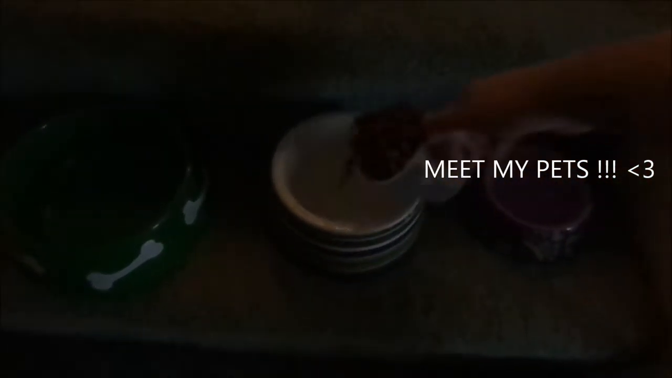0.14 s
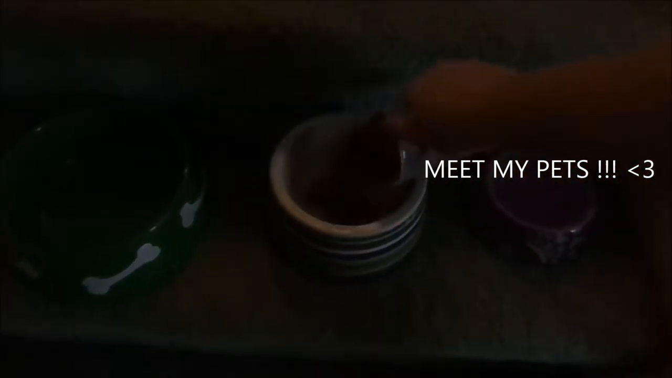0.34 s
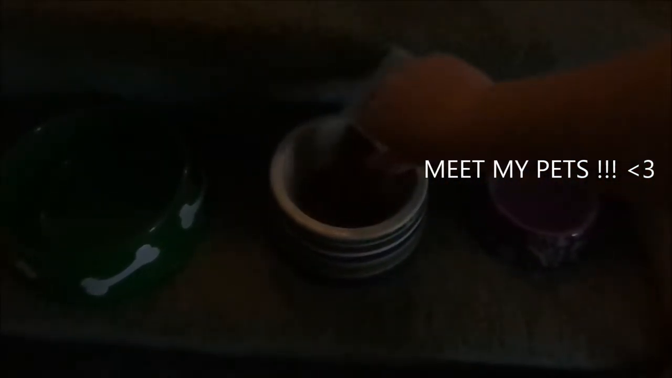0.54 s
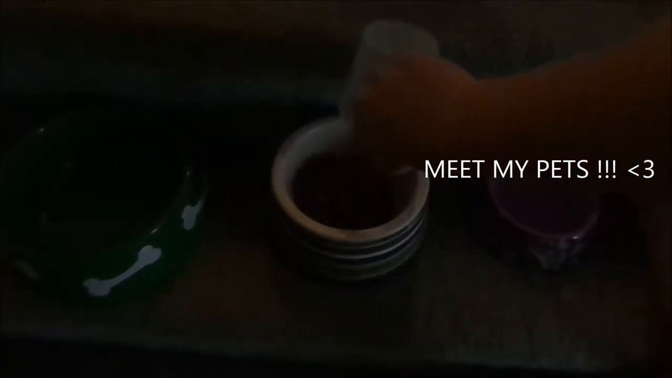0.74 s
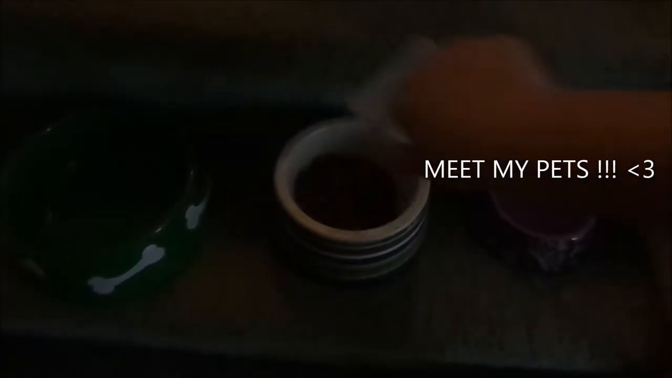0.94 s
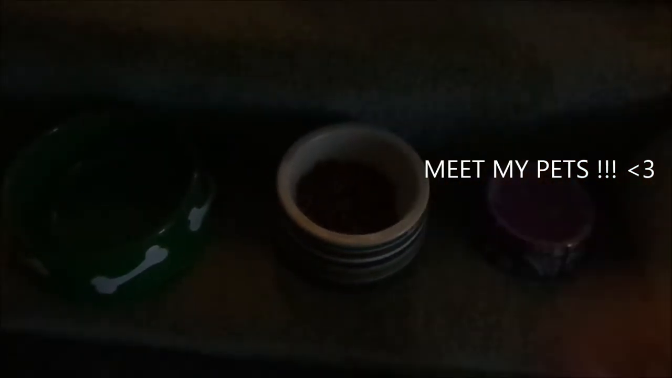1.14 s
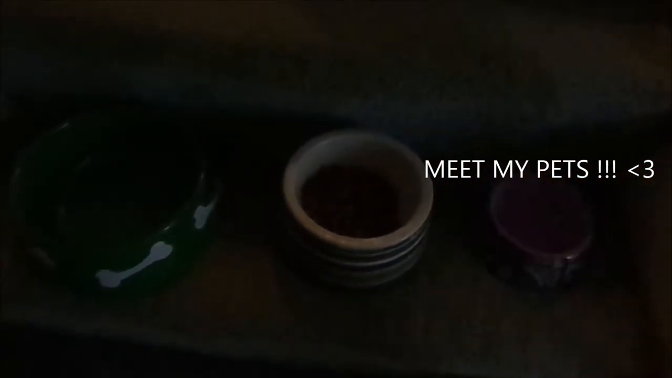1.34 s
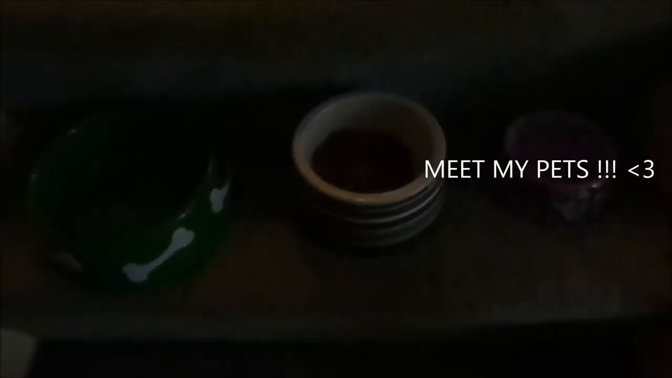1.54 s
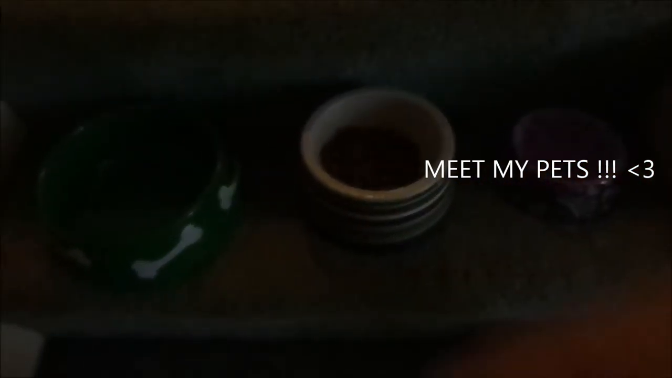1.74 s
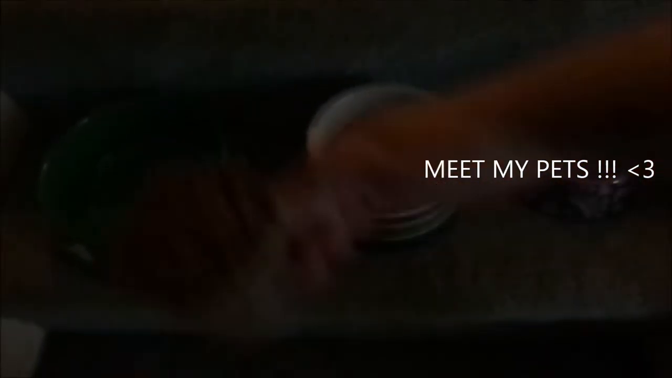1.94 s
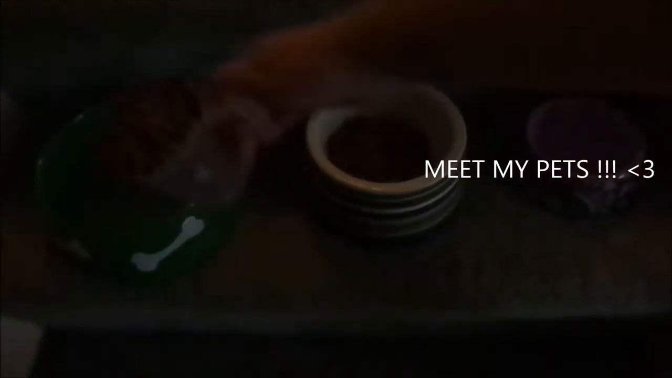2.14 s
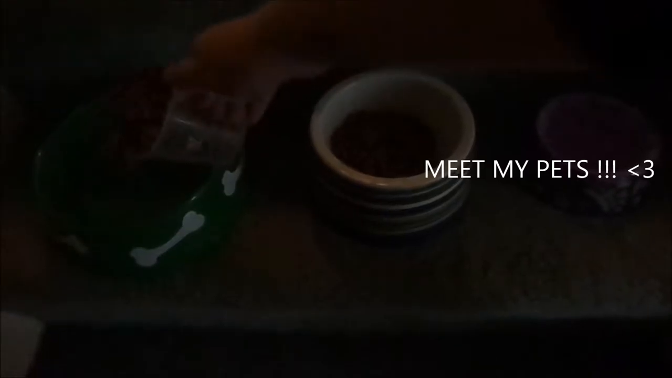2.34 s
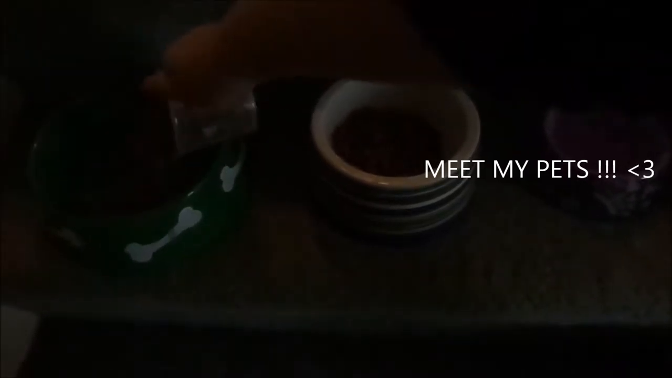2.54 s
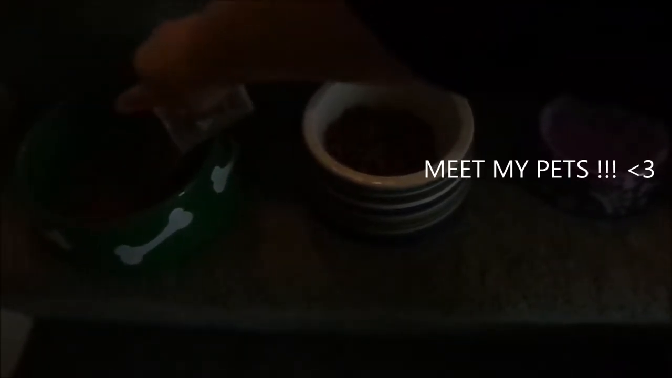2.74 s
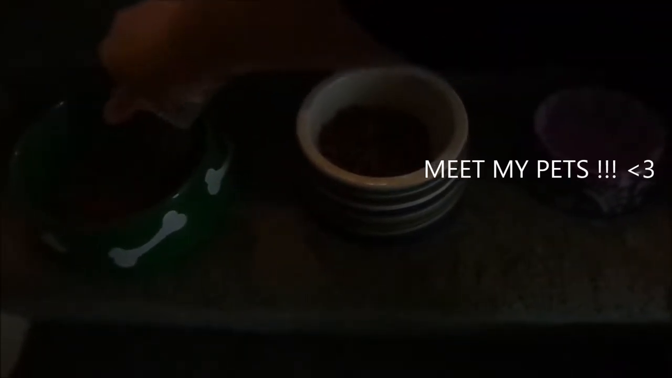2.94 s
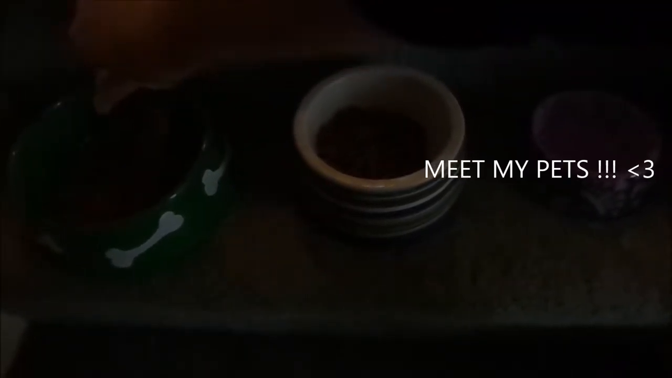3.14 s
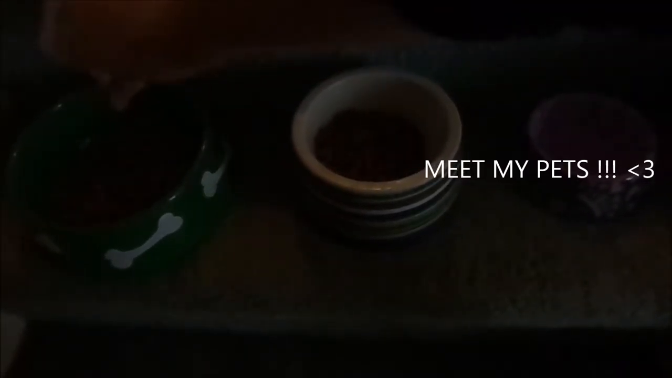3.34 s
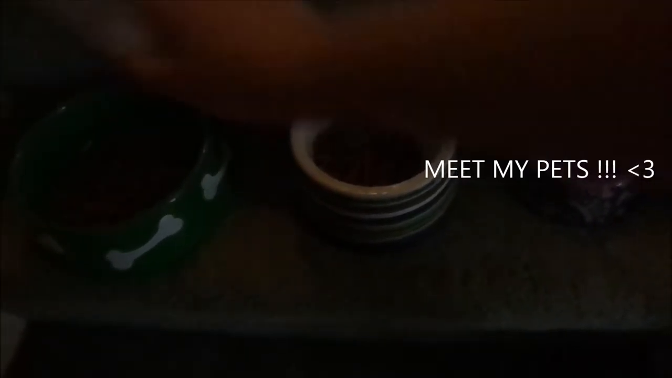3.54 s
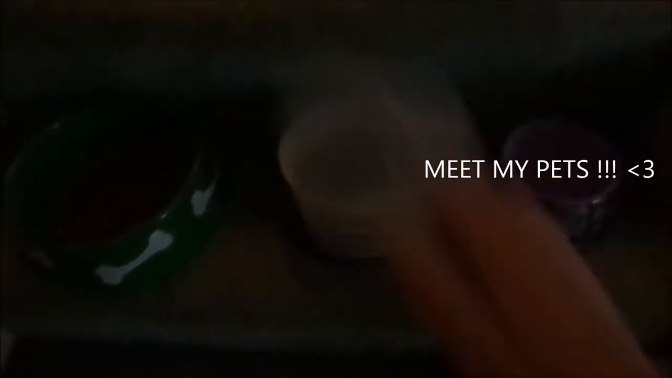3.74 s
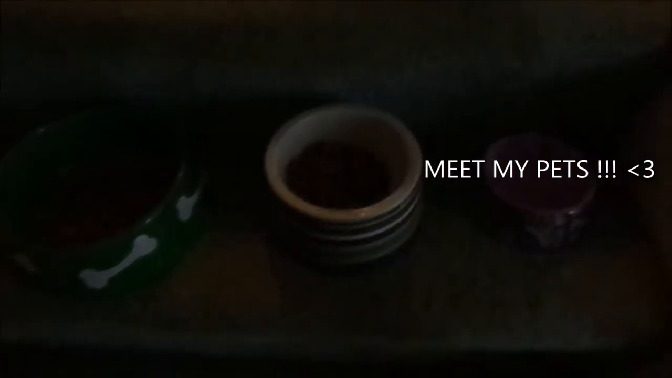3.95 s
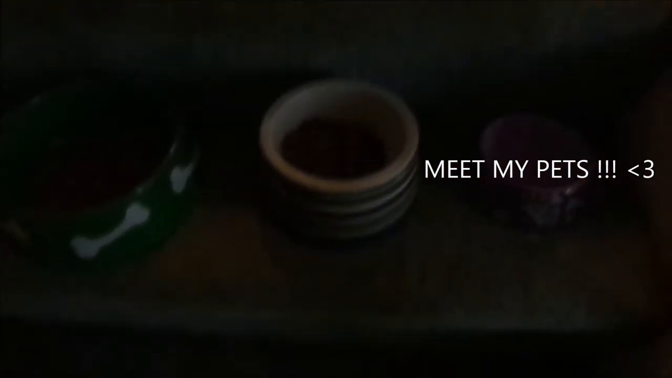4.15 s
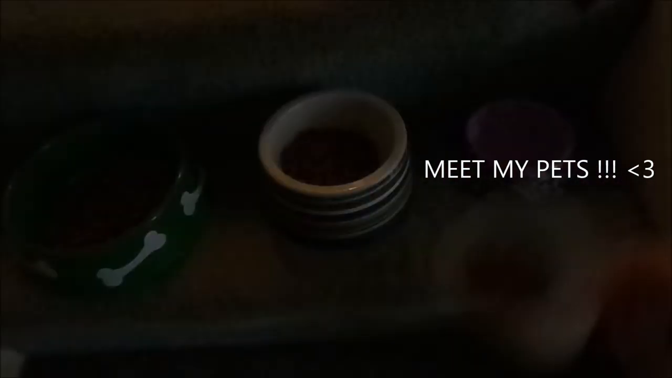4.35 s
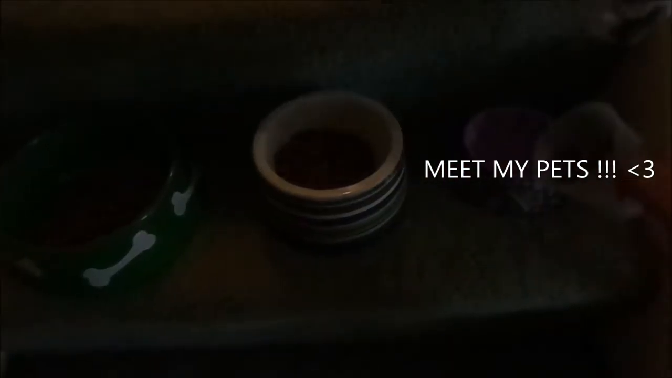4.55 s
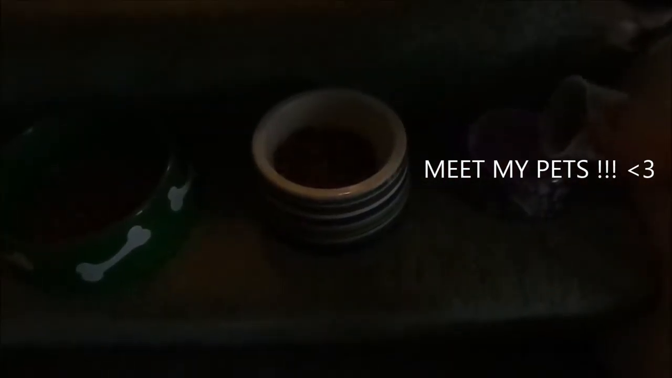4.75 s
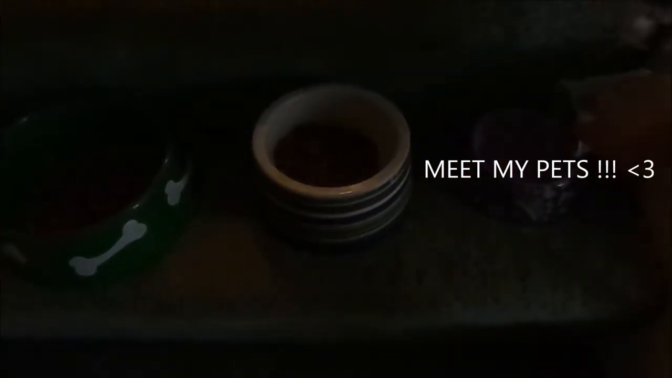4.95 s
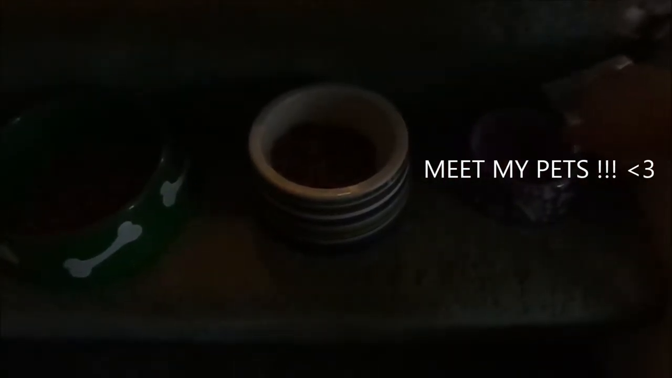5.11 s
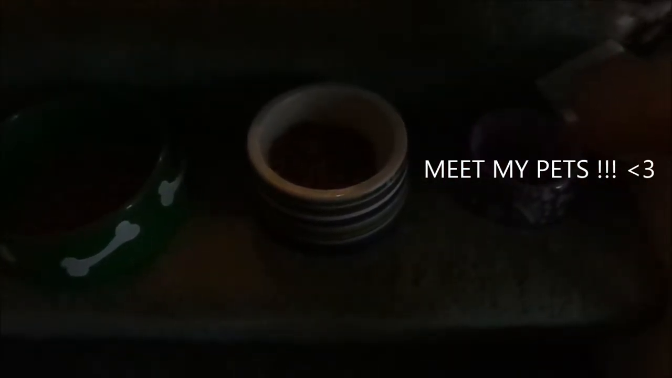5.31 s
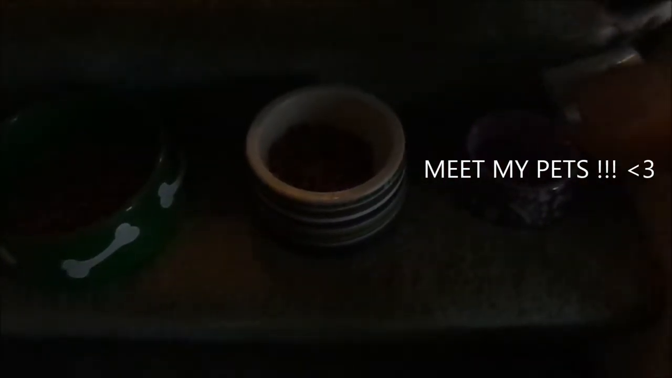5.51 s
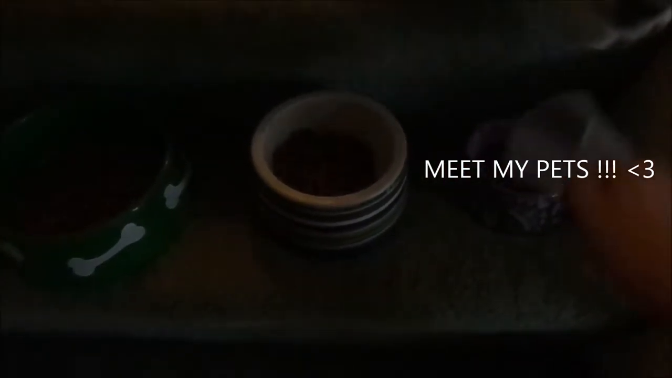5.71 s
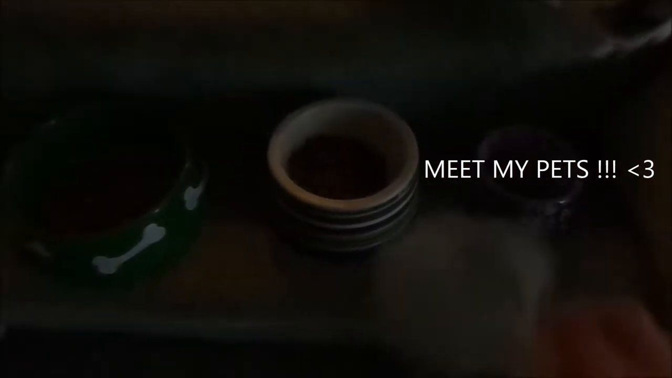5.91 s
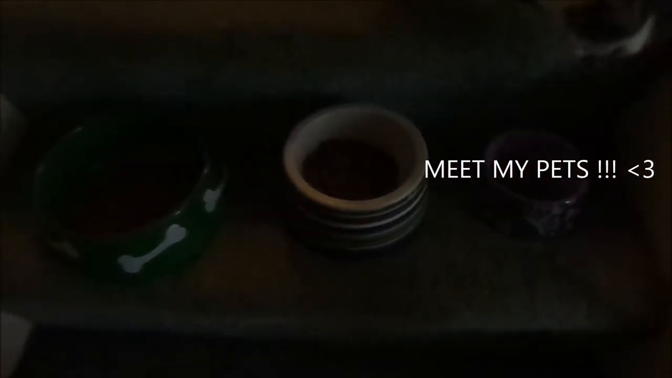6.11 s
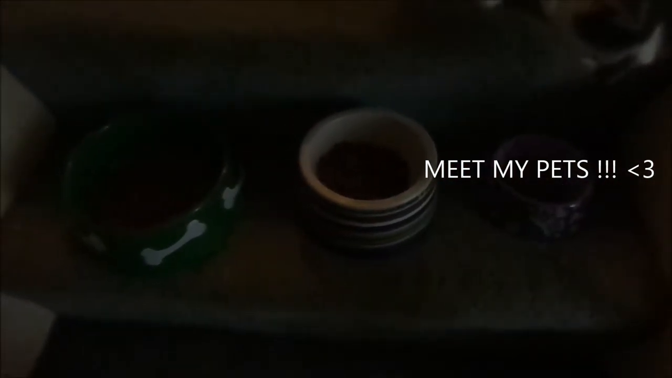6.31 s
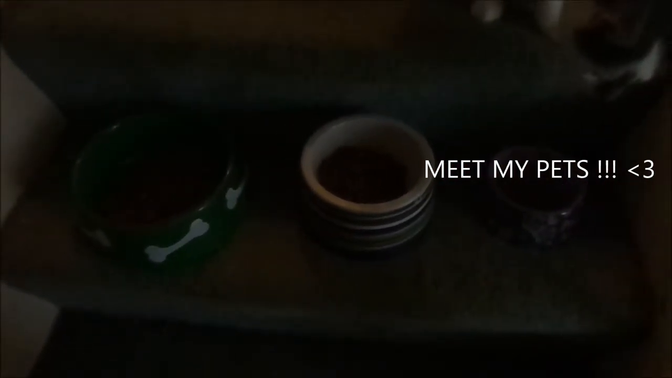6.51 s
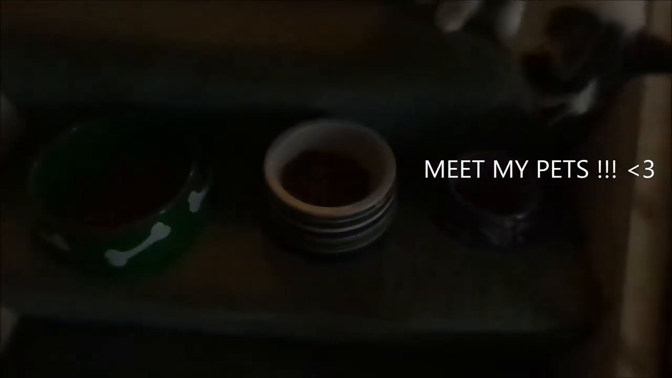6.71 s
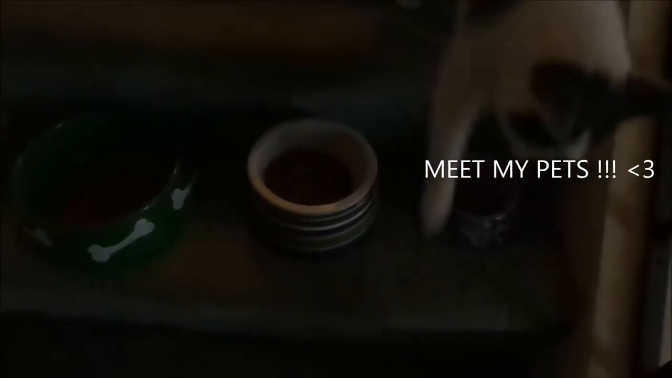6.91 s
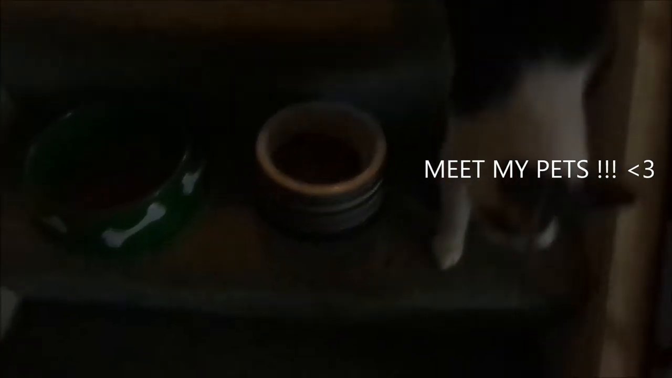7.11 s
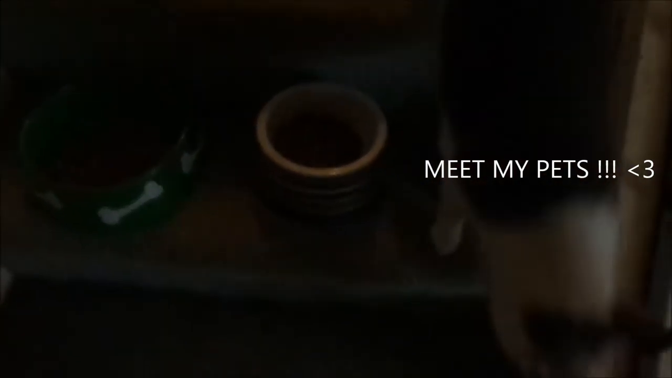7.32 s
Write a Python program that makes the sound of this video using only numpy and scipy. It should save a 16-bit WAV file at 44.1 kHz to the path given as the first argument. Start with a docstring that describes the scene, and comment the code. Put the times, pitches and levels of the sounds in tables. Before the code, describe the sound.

A soft scuff and a tiny tinkle open the scene in a small, quietly humming room. At 0.3 seconds dry pet food rattles from a plastic cup into a ringing bowl close by, the clicks dulling as it fills and ending around 1 second. A tiny collar bell tinkles, feet scuff, and a distant cat mews faintly at 1.6 seconds. From 2.4 seconds pellets clatter into a wide, duller bowl, trailing off in stray clicks by 3.5. A second faint, thin mew follows at 3.7. At 5 seconds a short, bright pour fills a little bowl, and at 5.5 a dog gives one muffled woof. At 6.4 something is put down with a sharp knock and a few light wooden taps. Feet and paws keep scuffing softly, and the collar bell tinkles again at about 7.3 seconds.

```python
"""A soft scuff and a tiny tinkle, then dry pet food rattles from a plastic cup into three bowls in a
small room: a ringing one, a wide dull one, a little one. Every pellet clicks and rings its bowl.
Something is put down with a knock and light wooden taps. Further off, a cat mews faintly twice in thin
harmonics and a dog gives one muffled woof of throaty pulses. Feet and paws scuff about, a ball rattles
in a tiny collar bell, and the house hums underneath."""
import sys
import numpy as np
from scipy import signal
from scipy.fft import rfft, irfft
from scipy.io import wavfile
from scipy.ndimage import uniform_filter1d

SR = 44100
rng = np.random.default_rng(int(sys.argv[2]) if len(sys.argv) > 2 else 0)


def store_pcm(level_fs):
    """Save levels as 16-bit WAV."""
    pcm = np.round(np.clip(level_fs, -1, 1) * 32767).astype(np.int16)
    wavfile.write(sys.argv[1], SR, np.atleast_2d(pcm).T)


N = 325017
T = np.arange(N) / SR

# the ring of each bowl: pitch_hz, t60_s, energy_db
RINGING_BOWL_MODES = [(1268, .14, -5.5), (1402, 0.11, -16.5), (2455, .075, 1), (2500, 0.048, 2),
                      (3717, 0.028, 3), (3920, 0.016, 4.5), (4190, 0.027, -2.5), (4410, 0.038, -11),
                      (6040, 0.0096, -4), (6340, 0.022, -7), (6900, 0.0091, -6.5), (8070, .02, -12.5),
                      (8840, 0.017, -3), (8830, .02, -8.5)]
WIDE_BOWL_MODES = [(490.6, 0.18, -6.5), (734, 0.063, -6.5), (765, 0.073, -9.5), (1230, 0.06, -19),
                   (1531, 0.022, 2), (1744, 0.019, -2.5), (2200, 0.022, -2.5), (2430, 0.042, -13.5),
                   (3270, 0.017, -7), (4240, 0.026, -9.5)]
SMALL_BOWL_MODES = [(991, 0.068, -8), (1287, 0.033, -8.5), (2164, 0.05, -1.5), (2330, 0.013, -1.5),
                    (3410, 0.034, 0), (3670, 0.05, -9), (4140, 0.06, -8.5), (4600, 0.028, -16),
                    (5260, 0.0233, -12), (6200, 0.032, -24), (6600, 0.034, -15), (7520, 0.027, -14),
                    (8970, 0.011, -13.5), (11800, 0.018, -22)]
# EQ of a pellet's click in each bowl: freq_hz, gain_db
RINGING_BOWL_CLICK = [(100, -31), (350, -14), (700, -13.5), (1000, -7), (1300, -1), (1700, -9.5),
                      (2600, -4), (3600, -0.5), (5000, 0.5), (7500, 3.5), (10000, -3), (14000, -5),
                      (16000, -17)]
WIDE_BOWL_CLICK = [(47, -55), (120, -37), (250, -21), (400, -12), (490, -11), (580, -8), (757, -1),
                   (1000, -8), (1570, -4.5), (1910, -9.5), (2200, -5), (4200, -14.5), (13000, -23.5),
                   (15500, -36)]
SMALL_BOWL_CLICK = [(100, -24), (500, -3), (900, -3), (1700, -9), (2600, 1.5), (5200, 13), (8000, 6),
                    (13500, 4), (16000, -37)]
# surges of pellets sliding out of the cup: start_s, level_db, rise_s, hold_s, t60_s
SURGES = [(.305, -26, 0.022, 0.19, 0.64), (.425, -14.5, 0.028, .01, 0.06), (.58, -31, 0.12, .17, 0.14),
          (2.465, -20.5, 0.012, 0.063, .3), (2.54, -16.5, 0.019, 0.049, 0.14),
          (2.62, -20.5, 0.052, 0.18, 1.4), (2.68, -16, 0.024, .015, .22), (3.1, -33.5, 0.09, 0.071, 0.39),
          (4.955, -43.5, .005, 0.14, .1), (5.08, -19, 0.062, 0.098, 0.29)]
# single hard pellets that stand out of the stream: start_s, strength_db
HARD_PELLETS = [(.3044, 13.5), (.329, 0), (.3397, 10.5), (.343, 11.5), (.355, 5), (.3728, 12.5), (.404, 3),
                (.42, 4), (.4347, 7.5), (.49, 1.5), (.521, 2), (.638, -4), (.7124, -3.5), (.7395, 0.5),
                (.7603, 4), (.8161, 0.5), (.8473, 0), (2.311, -19), (2.412, 9), (2.443, 5.5), (2.463, 11.5),
                (2.472, 9), (2.51, 9.5), (2.54, 7), (2.556, 14), (2.564, 10.5), (2.591, 1), (2.608, 9.5),
                (3.336, -9.5), (3.393, -11), (3.434, -24), (3.489, -19.5), (5.0132, 9), (5.046, 2.5),
                (5.0555, 5), (5.086, 8), (5.095, 9), (5.109, 7), (5.1184, 5), (5.138, 8.5), (5.1593, 8.5),
                (5.237, 5.5), (5.266, -6), (5.2905, 1.5), (5.313, -4), (5.3375, -3.5)]


def pour(span_s, modes, click_eq, pellets_per_s, click_t60, ring_db, shift_s, empty_db=-42.5, spots=12):
    """Pellets land on random spots; each cracks and rings the bowl, whose share shifts as it fills."""
    flow = np.sqrt(sum((undb(db) * envelope(s, rise, hold, t60)) ** 2
                       for s, db, rise, hold, t60 in during(SURGES, span_s)))
    landings = (rng.random(N) < pellets_per_s / SR) & (flow > undb(empty_db))
    size_db = 3.5 * np.minimum(rng.exponential(size=N), 3)
    sizes = landings * undb(size_db) * rng.choice([-1, 1], N)
    # the flow sets how much energy lands in any 30 ms
    energy = uniform_filter1d(sizes ** 2, SR // 33)
    stream = sizes / np.sqrt(np.abs(energy) + pellets_per_s / SR / 2) * flow
    blows = stream + impulses(during(HARD_PELLETS, span_s))
    # ring against click, moving from the first ring_db value to the second
    ring_gain = undb(np.interp(T, [span_s[0], span_s[0] + shift_s], ring_db))
    contacts = [(click(click_eq, click_t60, tilt), body(modes)) for tilt in np.linspace(1.1, -1.1, spots)]
    spot = rng.integers(spots, size=N)
    out = np.zeros(N + SR)
    for i in np.flatnonzero(blows):
        crack, tone = contacts[spot[i]]
        out[i:i + len(tone)] += blows[i] * (crack + ring_gain[i] * tone) / np.hypot(1, ring_gain[i])
    return out[:N]


# the knock and its rebounds: start_s, strength_db
KNOCK_HITS = [(6.3967, -13), (6.398, -2), (6.4016, -10), (6.419, -16.5)]
# the object's ring: pitch_hz, t60_s, energy_db
KNOCK_MODES = [(178, 0.16, -9), (383, 0.067, -7), (930, .04, -9), (1010, 0.027, -10), (2340, 0.016, -14),
               (2780, 0.016, -8), (3090, 0.02, -7), (4120, 0.032, 5), (4270, 0.027, 3.5)]
# EQ of its crack and clatter: freq_hz, gain_db
KNOCK_EQ = [(47, -47), (110, -26), (177, -9), (260, -17), (366, 3), (620, -18.5), (950, 3.5), (1400, -19),
            (2400, -8), (3000, -6), (3600, -12), (4250, -5.5), (5200, -11), (10700, -21.5), (15500, -32)]


def knock():
    """A hard object meets the floor with a clack and a short clatter."""
    clack = undb(11) * click(KNOCK_EQ, t60=0.024) + undb(10) * body(KNOCK_MODES)
    clatter = undb(7) * click(KNOCK_EQ, t60=0.22)
    return ring(impulses(KNOCK_HITS), clack + clatter)


# light taps after the knock: start_s, strength_db, brightness_hz
WOOD_TAPS = [(6.443, 1, 600), (6.508, -10, 600), (6.5203, -3.5, 900), (6.536, -6, 600), (6.757, -9.5, 4002)]
# the wood's ring: pitch_hz, t60_s, energy_db
WOOD_MODES = [(902, 0.05, -3), (1046, 0.045, -2.5), (1310, 0.014, -4), (2500, 0.013, -4), (3320, .015, 3),
              (4140, .015, -2)]


def wooden_taps():
    """Small wooden taps, each with its own strength and brightness."""
    blows = sum(signal.lfilter(*signal.butter(1, hz, fs=SR), impulses([(s, db)]))
                for s, db, hz in WOOD_TAPS)
    return ring(blows, body(WOOD_MODES))


# resonances of the dog's throat: centre_hz, width_hz, gain_db
DOG_THROAT = [(327, 43, 6), (415, 320, -1.5), (715, 99, 3.5), (1050, 130, -5.5)]


def woof(note_at_s=5.525, note_s=0.0341, sink_hz_per_s=893, swell_db_per_s=330, jitter=0.01244):
    """A closed-mouth bark swells, breaks into a clear note, then turns gruff, sinks and dies away."""
    age = T - note_at_s
    clear = uniform_filter1d(1. * ((age > 0) & (age < note_s)), SR // 100)
    pitch_hz = np.maximum(415 - sink_hz_per_s * np.maximum(age - note_s, 0), 330)
    phase = 2 * np.pi * np.cumsum(pitch_hz * (1 + jitter * wobble(120))) / SR
    note = level(np.sin(phase) + undb(-16) * (np.sin(2 * phase) + np.sin(3 * phase)))
    puffs = rng.standard_normal(N) * (1 + np.cos(phase))
    throat = sum((-1) ** k * undb(db) * band(puffs, hz, width)
                 for k, (hz, width, db) in enumerate(DOG_THROAT))
    muffle = signal.butter(8, [272, 1130], "band", fs=SR, output="sos")
    gruff = level(signal.sosfilt(muffle, throat))
    gruff_share = np.interp(clear, [0, 1], [0.86, 0.093])
    voice = np.sqrt(1 - gruff_share) * note + np.sqrt(gruff_share) * gruff
    swell_db = -20.5 + swell_db_per_s * np.minimum(age, 0) + 1.5 * clear
    return voice * undb(swell_db) * fade(np.maximum(age - 0.071, 0), t60=0.22)


# the two mews: start_s, hold_s, opening_pitch_hz, top_pitch_hz, glide_s, level_db
MEWS = [(1.603, 0.25, 837, 863, 0.102, -56.5), (3.66, 0.42, 677, 798.5, .21, -54)]
# EQ of the cat's mouth, one curve per mew: freq_hz, gain_db
CAT_MOUTHS = [
    [(860, -1.5), (1730, 1), (2600, -.5), (3470, -8.5), (4330, -15.5), (7000, -33.5)],
    [(790, -9), (1600, -1), (2400, 0), (3200, -10.5), (4000, -15), (6400, -34)],
]


def mew(row, mouth, jitter=0.00416, sag_db_per_s=13.5):
    """Thin, clean harmonics shaped by the cat's mouth glide up to a held pitch and slowly weaken."""
    start_s, hold_s, opening_hz, top_hz, glide_s, db = row
    pitch_hz = np.interp(T, [start_s, start_s + glide_s], [opening_hz, top_hz])
    sag = undb(-sag_db_per_s * np.maximum(T - start_s, 0))
    effort = envelope(start_s, rise=0.043, hold=hold_s, t60=.55) * sag
    gate = effort > undb(-40)
    phase = 2 * np.pi * np.cumsum(pitch_hz * (1 + jitter * wobble(50))) / SR
    voice = np.zeros(N)
    voice[gate] = sum(undb(at_hz(mouth, k * pitch_hz[gate])) * np.sin(k * phase[gate])
                      for k in range(1, 9))
    return voice * effort * undb(db)


# scuffs of feet, paws and hands: start_s, level_db, t60_s
SCUFFS = [(0, -36, 0.48), (0.271, -43.5, 0.25), (.95, -48, .4), (1.138, -49.5, 0.46), (1.203, -42.5, 0.61),
          (1.441, -42.5, 0.41), (3.52, -57, .7), (3.692, -50, 0.28), (4.423, -53, .4), (4.484, -43, 0.25),
          (4.84, -56.5, 0.32), (4.954, -46.5, 0.47), (5.42, -48, 0.65), (5.548, -41.5, 1),
          (6.062, -45.5, 0.25), (6.248, -44.5, .3), (6.668, -45, 1), (7.177, -37, 0.29), (7.335, -46.5, .3)]
# EQ of the friction: freq_hz, gain_db
SCUFF_EQ = [(200, -14.5), (900, -4), (2000, -5.5), (3800, 1), (5500, -6), (9000, -9), (13000, -7.5),
            (16000, -21.5)]


def scuffs(grain_db=3.0):
    """Short slides: fine friction grains that swell quickly and die away."""
    power = sum((undb(db) * envelope(s, rise=0.012, hold=0, t60=t60)) ** 2 for s, db, t60 in SCUFFS)
    noise = rng.standard_normal(N)
    grains = np.repeat(rng.standard_normal(N // 32 + 1), 32)[:N]
    return level(colour(noise * undb(grain_db * grains), SCUFF_EQ)) * np.sqrt(power)


# shakes of the collar: start_s, strength_db
BELL_SHAKES = [(.135, -19), (.83, -11), (.903, -6.5), (1.268, -17), (7.345, -5)]
# the bell's ring: pitch_hz, t60_s, energy_db
BELL_MODES = [(7840, 0.13, -1.5), (12120, .06, 4), (13200, .08, 2), (12955, .12, 6.5), (13120, .06, -18)]


def collar_bell():
    """The loose ball rattles inside the tiny bell at each shake."""
    rattle = click(t60=0.077)
    tinkle = unit(ring(rattle, body(BELL_MODES)))
    return ring(impulses(BELL_SHAKES), tinkle)


# EQ of the house's hum: freq_hz, gain_db
ROOM_TONE_EQ = [(15, -53.5), (25, -30.5), (173, -21.5), (198, -21.5), (233, -8.5), (297, -14), (340, -7.5),
                (482, -7), (666, -7.5), (848, -5), (1270, -11.5), (1950, -14), (3170, -21.5), (4150, -28),
                (15500, -37.5)]


def room_tone(waver_db=.5):
    """The soft steady hum of the house: dark noise that wavers slightly."""
    return level(colour(rng.standard_normal(N), ROOM_TONE_EQ), db=-52) * undb(waver_db * wobble(14))


# reverb time of the small room: freq_hz, t60_s
ROOM_DECAY = [(200, 0.16), (1000, 0.57), (4000, 0.47), (14000, 0.37)]


def room(x, wet_db, gap_s=.004):
    """Direct sound plus a diffuse tail that lingers longest in the mids."""
    t, tail = T[:SR * 2 // 3], 0
    edges_hz = [20, 300, 700, 1500, 3000, 6000, 10000, 18000]
    for lo, hi in zip(edges_hz, edges_hz[1:]):
        bandpass = signal.butter(3, [lo, hi], "band", fs=SR, output="sos")
        noise = signal.sosfilt(bandpass, rng.standard_normal(len(t)))
        tail = tail + noise * fade(t, at_hz(ROOM_DECAY, np.sqrt(lo * hi)))
    return x + undb(wet_db) * ring(x, unit(tail * (t > gap_s)))


# EQ of the stereo side signal: freq_hz, gain_db
SIDE_EQ = [(100, -16.5), (400, -23.5), (1500, -34), (4000, -29), (13000, -19)]


def widen(x, side_db):
    """A short diffuse burst widens the sound from left to right, mostly in the bass and high treble."""
    diffuse = ring(x, click(t60=.03))
    side = undb(side_db) * colour(diffuse, SIDE_EQ)
    return np.array([x + side, x - side])


def body(modes):
    """The ring of one blow: each contact point weights and detunes the modes a little differently."""
    t, out = T[:SR // 3], 0
    for (hz, t60, db), (weight, detune, polarity) in zip(modes, rng.standard_normal((len(modes), 3))):
        tone = np.cos(2 * np.pi * hz * (1 + .004 * detune) * t) * fade(t, t60)
        out = out + np.sign(polarity) * undb(db + 2 * weight) * unit(tone)
    return unit(out)


def click(eq=((20, 0), (20000, 0)), t60=.03, tilt_db_per_octave=0):
    """The dry crack of one contact, a noise burst; a harder one tilts upwards above 1 kHz."""
    t = T[:SR // 3]
    tilted = [(hz, db + tilt_db_per_octave * np.log2(max(hz, 1000))) for hz, db in eq]
    return unit(colour(rng.standard_normal(len(t)) * fade(t, t60), tilted))


def colour(x, eq, size=2048):
    """Causal filter with the given EQ curve, built from its cepstrum."""
    gains = undb(at_hz(eq, np.fft.rfftfreq(size, 1 / SR)))
    cepstrum = irfft(np.log(gains))
    cepstrum[1:size // 2] *= 2
    cepstrum[size // 2 + 1:] = 0
    return ring(x, irfft(np.exp(rfft(cepstrum))))


def ring(x, response):
    """Pass a sound through an impulse response."""
    return signal.oaconvolve(x, response)[:len(x)]


def band(x, hz, width_hz):
    """One resonance, gain 1 at its centre."""
    return signal.lfilter(*signal.iirpeak(hz, hz / width_hz, fs=SR), x)


def at_hz(points, hz):
    """Read a curve on a log-frequency axis."""
    freqs, values = np.transpose(points)
    return np.interp(np.log(np.maximum(hz, 1)), np.log(freqs), values)


def impulses(rows):
    """An impulse for each (start_s, strength_db) row."""
    out = np.zeros(N)
    for s, db in rows:
        out[int(s * SR)] += undb(db)
    return out


def during(rows, span_s):
    """The events that start within a span of time."""
    return [row for row in rows if span_s[0] <= row[0] < span_s[1]]


def envelope(start_s, rise, hold, t60):
    """Linear attack, hold and exponential release, in seconds."""
    age = T - start_s
    return np.clip(age / rise, 0, 1) * fade(np.maximum(age - rise - hold, 0), t60)


def fade(t, t60):
    """Exponential decay, 60 dB down after t60 seconds."""
    return np.exp(-np.log(1000) * t / t60)


def wobble(rate_hz):
    """Smooth random motion of spread 1."""
    knots = rng.standard_normal(int(rate_hz * N / SR) + 2)
    return level(np.interp(T * rate_hz, np.arange(len(knots)), knots))


def level(x, db=0):
    """Scale to an rms level."""
    return unit(x) * np.sqrt(len(x)) * undb(db)


def unit(x):
    """Scale to energy 1."""
    return x / np.sqrt(np.sum(x ** 2) + 1e-18)


def undb(db):
    """Decibels to gain."""
    return 10 ** (np.asarray(db) / 20)


def scene():
    """Three pours close by, the animals further off."""
    ringing = pour((.3, 2), RINGING_BOWL_MODES, RINGING_BOWL_CLICK,
                   pellets_per_s=1000, click_t60=0.016, ring_db=(11, -21.5), shift_s=0.41)
    wide = pour((2.3, 4), WIDE_BOWL_MODES, WIDE_BOWL_CLICK,
                pellets_per_s=480, click_t60=0.023, ring_db=(3, -5), shift_s=0.76)
    small = pour((4.9, 6), SMALL_BOWL_MODES, SMALL_BOWL_CLICK,
                 pellets_per_s=900, click_t60=0.024, ring_db=(-10.5, 6.5), shift_s=0.31)
    bowls = widen(room(ringing, wet_db=-9), side_db=-1)
    bowls += widen(room(wide, wet_db=-8), side_db=-14)
    bowls += widen(room(small, wet_db=-13.5), side_db=-23)
    foley = room(knock() + wooden_taps(), wet_db=-14.5) + room(scuffs(), wet_db=-3) + collar_bell()
    cat = room(sum(mew(row, mouth) for row, mouth in zip(MEWS, CAT_MOUTHS)), wet_db=-1.5)
    dog = room(woof(), wet_db=-11.5, gap_s=0.028)
    return bowls + widen(foley, side_db=-4.5) + cat + dog + room_tone()


def record(dry, dropout_s=(1.594, 1.626), top_hz=15300):
    """The microphone clips the hardest strikes unevenly, adding a low thud; the sound drops out once."""
    limit = np.where(dry > 0, 0.59, 0.51)
    clipped = dry / (1 + (dry / limit) ** 8) ** (1 / 8)
    live = (T < dropout_s[0]) | (T > dropout_s[1])
    lowpass = signal.ellip(8, .2, 70, top_hz, fs=SR, output="sos")
    return signal.sosfilt(lowpass, clipped * live)


dry = scene()
out = record(dry)
store_pcm(out)
```